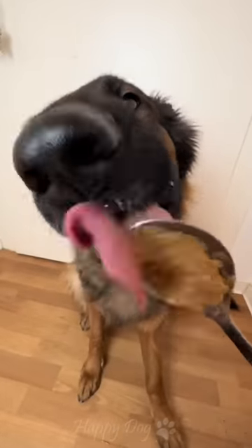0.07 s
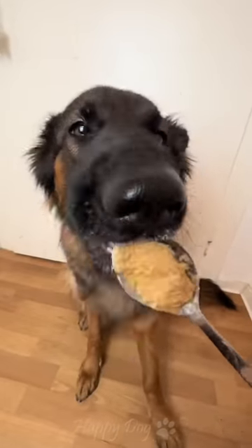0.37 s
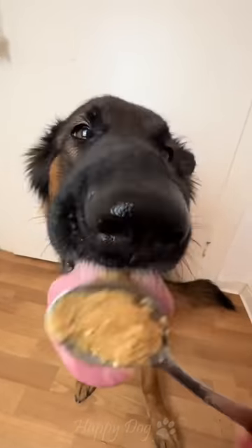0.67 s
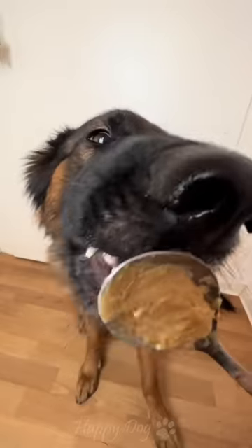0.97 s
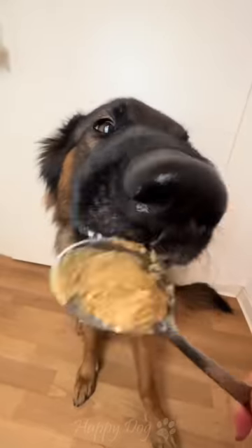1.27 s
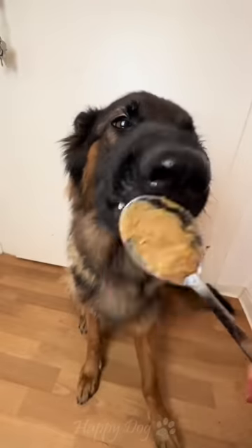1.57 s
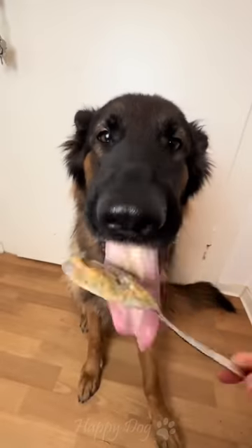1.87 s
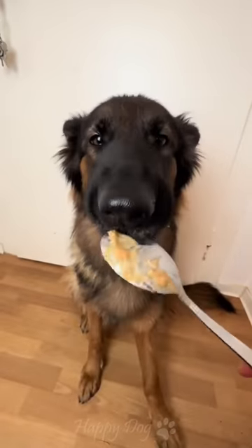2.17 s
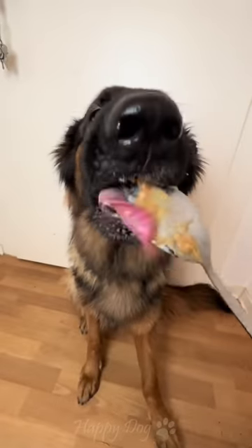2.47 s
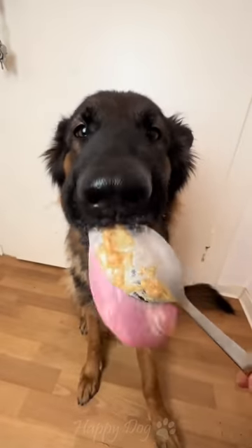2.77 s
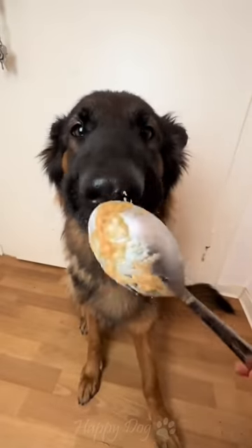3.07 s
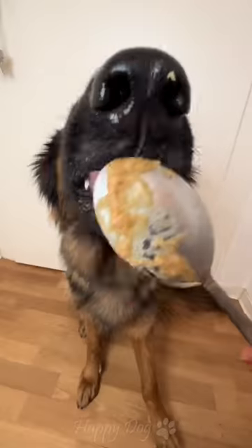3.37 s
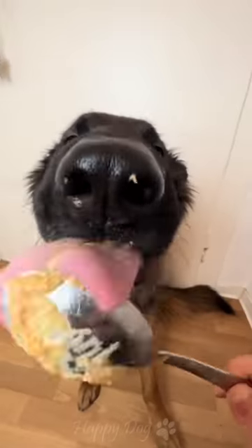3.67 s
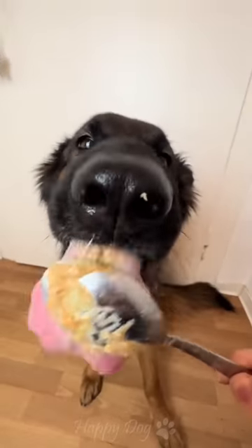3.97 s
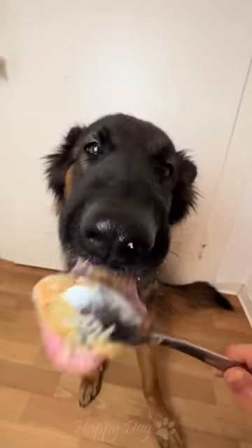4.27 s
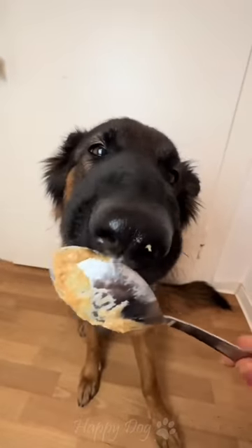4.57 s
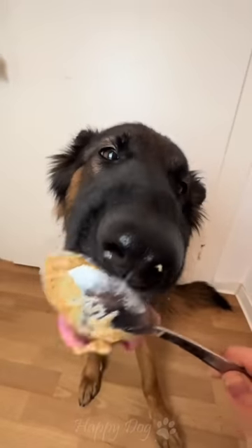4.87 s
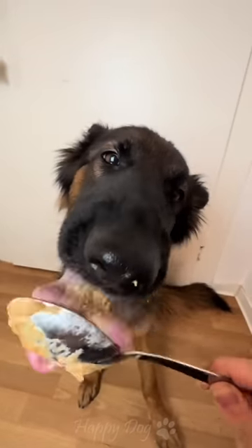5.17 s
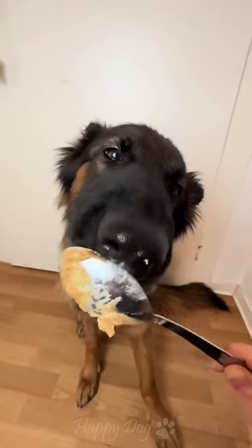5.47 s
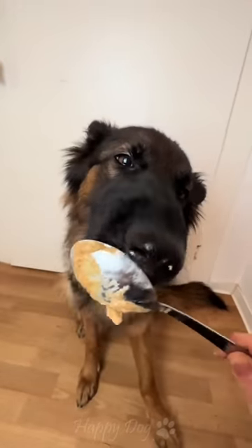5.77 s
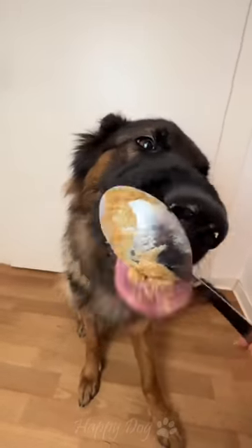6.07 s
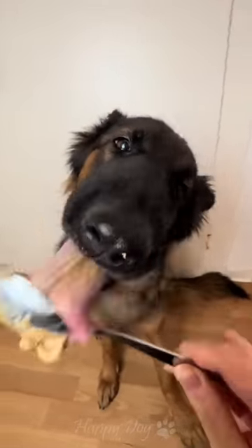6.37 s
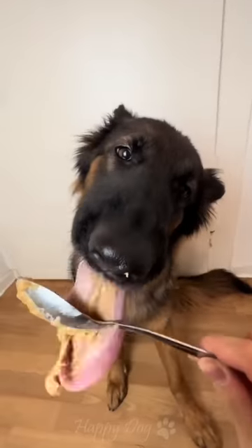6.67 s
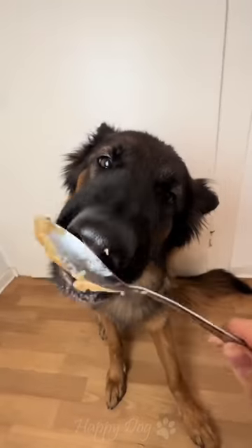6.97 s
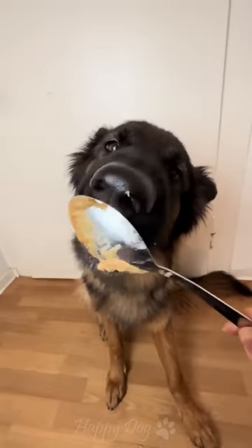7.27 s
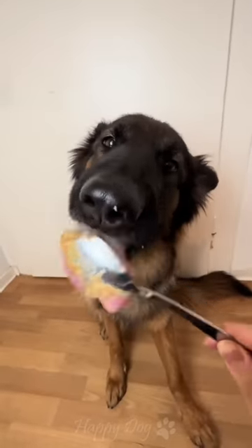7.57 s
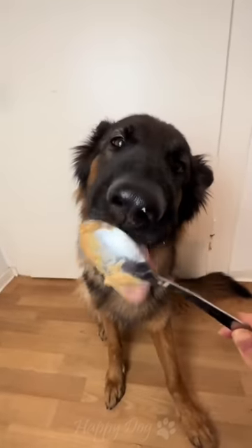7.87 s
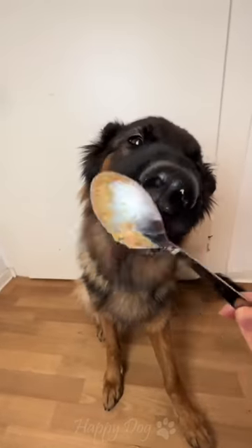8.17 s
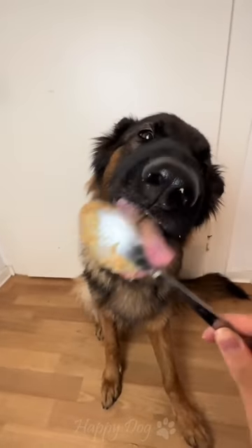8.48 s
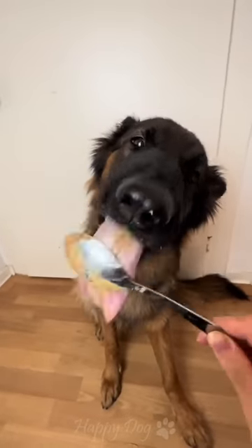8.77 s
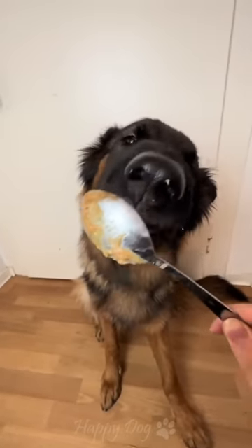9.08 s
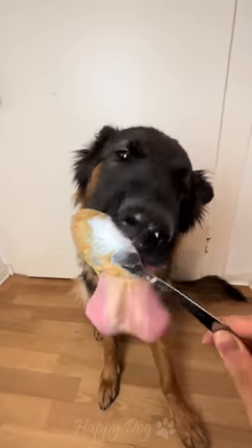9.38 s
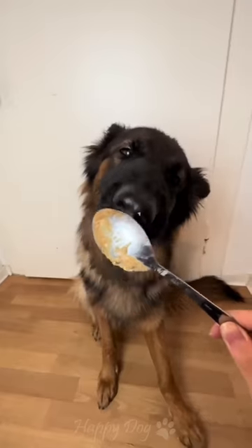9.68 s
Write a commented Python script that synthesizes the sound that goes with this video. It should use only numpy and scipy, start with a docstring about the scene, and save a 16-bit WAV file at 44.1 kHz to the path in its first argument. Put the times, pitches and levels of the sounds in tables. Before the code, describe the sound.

In a small room with a faint rumble and an appliance whirring, a dog laps at a spoonful of paste very close to the microphone. Its tongue squelches, its lips smack and its jowls flap softly. One loud chomp comes a little before the middle. Later a dollop lands on the floor with a soft thud, and the wet smacking goes on, somewhat stronger, to the end.

```python
"""A dog licks soft paste off a spoon, right in front of a phone's microphones in a small hard-floored room.
Tongue and lips part with sharp wet smacks and longer squelches that ring the mouth; once the jaws
chomp loudly. Up close, the tongue rubs, saliva crackles faintly, the muzzle bumps and the jowls flap.
A dollop of paste lands on the floor. Behind it all lie a low room rumble and an appliance's thin whirr."""
import sys
import numpy as np
from scipy import signal
from scipy.fft import rfft, irfft, next_fast_len
from scipy.io import wavfile
from scipy.ndimage import uniform_filter1d, map_coordinates

SR = 44100
rng = np.random.default_rng(int(sys.argv[2]) if len(sys.argv) > 2 else 0)


def to_wav(sig):
    """Store sig (one row per channel, or 1-D mono) as 16-bit WAV at the path in sys.argv[1].

    Samples outside -1..1 are clipped; the rate is SR.
    """
    pcm = np.clip(np.atleast_2d(sig), -1, 1) * 32767
    pcm = np.round(pcm).astype(np.int16)
    wavfile.write(sys.argv[1], SR, pcm.T)  # frames by channels


N = 433944
SIZE = 8192  # samples in the buffer of one short sound
T = np.arange(SIZE) / SR
HZ = np.fft.rfftfreq(SIZE, 1 / SR)
PEAK_S = T[SIZE // 4]  # where a smack or swell peaks in its buffer


def amp(db):
    return 10 ** (np.asarray(db) / 20)


def unit(x):
    return x / np.sqrt(np.mean(x ** 2) + 1e-20)


def burst(x):
    """Scale a short stereo sound to the energy of 10 ms at rms 1."""
    return unit(x) * np.sqrt(SR / 100 / SIZE)


def along(points, hz):
    """Interpolate (Hz, value) points on a log axis."""
    freqs, values = np.transpose(points)
    return np.interp(np.log(hz + 1), np.log(freqs), values)


def curves(rows):
    """One value per sample for each column after the time."""
    times, *columns = np.transpose(rows)
    return [np.interp(np.arange(N) / SR, times, column) for column in columns]


def filtered(x, response):
    """Filter x by a response given as a function of frequency."""
    size = next_fast_len(N + SR // 2)
    return irfft(rfft(x, size) * response(np.fft.rfftfreq(size, 1 / SR)), size)[..., :N]


def resonance(f, centre, width):
    """Causal response of one damped mode."""
    return 1j * f * width / (centre ** 2 - f ** 2 + 1j * f * width)


def ring(source, hz, width, skirt):
    """A drive spectrum rings one mode, which falls off faster beyond the skirt width."""
    return burst(irfft(source * resonance(HZ, hz, width) * resonance(HZ, hz, skirt)))


def add(track, s, sound):
    """Mix a sound in at s seconds."""
    start = round(s * SR)
    part = sound[:, max(-start, 0):max(N - start, 0)]
    track[:, max(start, 0):max(start, 0) + part.shape[1]] += part


def swell(length):
    """A rise and fall about length seconds long, centred on PEAK_S."""
    return np.exp(-np.abs((T - PEAK_S) / (0.28 * length)) ** 2.4)


def wobble(rate):
    """A smooth random curve, rate knots a second."""
    return map_coordinates(rng.standard_normal(int(N * rate / SR) + 4), [np.arange(N) * rate / SR])


# How alike the two microphones hear. Each row: frequency in Hz, left-right correlation.
MIC_LIKENESS = [(60, 0.98), (200, 0.98), (600, 0.54), (2000, 0.76), (5000, 0.45), (12000, 0.64)]
def mic_pair(spectra, f):
    """Turn two unrelated spectra into a partly alike left and right."""
    turn = np.arccos(np.clip(along(MIC_LIKENESS, f), 0, 1)) / 2
    mid, side = spectra[0] * np.cos(turn), spectra[1] * np.sin(turn)
    return np.array([mid + side, mid - side])


def coloured(x, response):
    """Filter two unrelated signals into a long stereo sound of rms 1."""
    size = next_fast_len(N + SIZE)
    f = np.fft.rfftfreq(size, 1 / SR)
    return unit(irfft(mic_pair(rfft(x, size), f) * response(f), size)[:, :N])


# The room's rumble. Each row: frequency in Hz, relative level in dB.
RUMBLE_SPECTRUM = [(15, -8), (30, -1), (65, 5), (120, 1), (170, -22.5), (300, -9.5), (520, -49),
                   (1200, -11), (3000, -55.5), (15000, -78)]
# An appliance in the background. Each row: centre in Hz, width in Hz, relative level in dB.
WHIRR_BANDS = [(825, 58, -12.5), (1700, 370, -4.5)]
def room_tone(rumble_db=-59, whirr_db=-58):
    """Behind the dog: steady room rumble and the airy whirr of an appliance."""
    rumble = coloured(rng.standard_normal((2, N)), lambda f: amp(along(RUMBLE_SPECTRUM, f)))
    bands = lambda f: sum(amp(db) * abs(resonance(f, hz, width)) ** 2 for hz, width, db in WHIRR_BANDS)
    whirr = coloured(rng.standard_normal((2, N)), bands)
    return amp(rumble_db) * rumble + amp(whirr_db) * whirr


# Jowls and body moving near the phone. Each row: time in seconds, level in dB before gain_db.
JOWL_LEVELS = [(0, -64), (.25, -47.5), (.38, -67.5), (1.06, -50), (1.34, -60.5), (1.7, -54), (2.05, -48.5),
               (2.43, -71), (2.62, -53), (2.95, -58), (3.45, -51), (4.25, -54), (5.1, -53), (5.37, -61),
               (5.8, -54), (6.9, -57), (8.5, -64), (9.84, -57.5)]
def jowls(hz=85, width_hz=90, gain_db=-2, edge_hz=300):
    """Loose lips and fur flap with a dull murmur."""
    def dull(f):
        return resonance(f, hz, width_hz) * resonance(f, hz, 3 * width_hz) / np.hypot(1, (f / edge_hz) ** 2)
    level, = curves(JOWL_LEVELS)
    return amp(level + gain_db) * coloured(rng.standard_normal((2, N)), dull)


def crackle(size, rate, spread_db, hiss):
    """Two streams of tiny saliva films bursting, rate a second, of uneven sizes, over a smooth hiss."""
    pops = (rng.random((2, size)) < rate / SR) * rng.choice([-1, 1], (2, size))
    sizes = amp(spread_db * np.minimum(rng.standard_normal((2, size)), 2))
    return unit(pops * sizes) + hiss * rng.standard_normal((2, size))


def wet_patches(x, patchy_db):
    """Wet spots come and go: short patches of gain, each in its own band."""
    spectra = signal.stft(x, nperseg=256)[2]
    patches = rng.standard_normal(spectra.shape[1:])
    patches = uniform_filter1d(uniform_filter1d(patches, size=9, axis=0), size=6, axis=1)
    return signal.istft(spectra * amp(patchy_db * unit(patches)), nperseg=256)[1][:, :N]


# The wet mouth between strokes. Each row: time in seconds, tongue rub and saliva fizz in relative dB.
RESTING_WETNESS = [(0.0, -49.5, -55), (0.46, -56.5, -58), (1.18, -53, -54), (1.64, -55, -61),
                   (2.77, -51.5, -55.5), (2.99, -52, -59), (3.75, -53.5, -53.5), (4.33, -50, -55.5),
                   (6.47, -48, -55), (7.01, -51.5, -57), (7.34, -48, -52.5), (8.74, -51, -56),
                   (9.15, -48, -50.5), (9.84, -49, -60.5)]
# Soft strokes over the spoon. Each row: middle in seconds, length in seconds, level in dB.
TONGUE_STROKES = [(.64, 0.02, -45.5), (1.1, 0.045, -50), (1.19, 0.053, -51.5), (1.33, 0.054, -47),
                  (1.47, .04, -51), (1.62, 0.043, -56), (1.89, 0.054, -50), (2.06, 0.025, -51),
                  (2.255, 0.019, -46.5), (2.43, 0.015, -53), (2.69, 0.045, -48), (3.05, 0.01, -49),
                  (3.27, .07, -52), (3.44, 0.063, -50), (3.58, 0.043, -53), (3.65, 0.048, -50),
                  (3.86, 0.24, -52), (3.97, 0.051, -56), (4.04, 0.028, -58), (4.19, 0.12, -61),
                  (4.66, 0.02, -49), (4.75, 0.037, -48), (5.12, 0.03, -62), (5.66, 0.15, -56),
                  (5.768, 0.028, -44.5), (6.11, 0.033, -54), (6.58, 0.072, -53), (6.91, 0.026, -55),
                  (7.33, 0.2, -56), (7.45, 0.03, -43.5), (7.81, 0.035, -56), (7.995, 0.025, -50),
                  (8.27, 0.032, -63), (8.36, 0.03, -47.5), (8.54, 0.036, -51), (8.69, 0.031, -53.5),
                  (8.885, 0.039, -51), (9.095, 0.057, -54), (9.41, 0.012, -52), (9.47, 0.01, -57)]
def tongue_levels(rest_rub_db=-4, rest_fizz_db=-1, stroke_rub_db=-1, slide_s=0.022, slide_db=-16):
    """Rub and fizz in dB: both swell on each stroke; the rub slides on after each smack and squelch."""
    def power(rows):
        t = np.linspace(0, N / SR, N // 64)
        swells = sum(amp(db) ** 2 * np.exp(-(2 * (t - s) / length) ** 2) for s, length, db in rows)
        return np.interp(np.arange(N) / SR, t, swells)
    strokes = power(TONGUE_STROKES)
    slides = power([(s + slide_s / 2, slide_s, cavity_db + slide_db)
                    for s, _, cavity_db, *_ in LIP_SMACKS + TONGUE_SQUELCHES])
    rub_db, fizz_db = curves(RESTING_WETNESS)
    rub = amp(rub_db + rest_rub_db) ** 2 + amp(stroke_rub_db) ** 2 * strokes + slides
    fizz = amp(fizz_db + rest_fizz_db) ** 2 + strokes
    return 10 * np.log10(rub), 10 * np.log10(fizz)


# Tongue rub and saliva fizz at close range. Each row: frequency in Hz, relative level in dB.
RUB_SPECTRUM = [(300, 5), (550, 5.5), (820, 11), (1150, 8), (1700, 10.5), (2700, 10.5), (4200, 6.5),
                (6000, -65)]
FIZZ_SPECTRUM = [(2500, -87), (4500, 10.5), (6000, 8.5), (8000, 6), (11000, 6.5), (13500, -1.5),
                 (16000, -6.5)]
def licking(clump_db=3.0):
    """The tongue sticks and slips on the spoon, so its rub and the fizz of saliva come in clumps."""
    rub_db, fizz_db = tongue_levels()
    clumps = clump_db * wobble(rate=110)
    slips = wet_patches(crackle(N, rate=1500, spread_db=3, hiss=1.4), patchy_db=2)
    films = wet_patches(crackle(N, rate=2000, spread_db=3, hiss=1.3), patchy_db=2.1)
    rub = coloured(slips, lambda f: amp(along(RUB_SPECTRUM, f)))
    fizz = coloured(films, lambda f: amp(along(FIZZ_SPECTRUM, f)))
    return amp(rub_db + clumps) * rub + amp(fizz_db + clumps) * fizz


# The mouth changes shape as the dog works, and slacker cheeks thud more.
# Each row: time in seconds, cavity note in Hz, added cheek thud in dB.
MOUTH_SHAPES = [(0, 800, -3), (1.2, 880, -3.5), (1.96, 780, 1), (2.75, 753, -1), (3.77, 780, -3.5),
                (4.6, 860, -1), (5.1, 810, -5), (5.72, 764, 0.5), (6.4, 834, -6.5), (6.6, 896, -12),
                (6.75, 765, -0.5), (7.1, 770, 5), (7.4, 830, -2), (7.74, 640, 6.5), (7.94, 850, -0.5),
                (8.12, 783, 4), (8.8, 815, -6.5), (9.3, 794, -3), (9.6, 854, -3)]
# A harder smack shakes the cheeks more. Each row: cavity level in dB, cheek thud in dB.
CHEEK_THUD = [(-58, -78), (-50.5, -58), (-44, -47), (-36, -39.5), (-27, -33.5)]
# Spray is low behind closed lips, high on the bare tongue. Each row: dB over the lip gap, pitch in Hz.
SPRAY_PITCH = [(-20, 5500), (-3, 6650), (-3.5, 7060), (35, 11700), (21.5, 12000)]
# Modes of the soft muzzle and the wet lips. Each row: centre in Hz, width in Hz, relative level in dB.
CHEEK_MODES = [(226, 88, 7), (437, 98, 6)]
SPLASH_MODES = [(2430, 720, -7), (5150, 620, -15)]
def mouth(drive, s, voicing, spray_q, spray_skirt, cavity_q=6.5, lip_q=6, note_scatter=0.015):
    """The drive rings the soft cheeks, the mouth cavity, the lip gap and the thin spray of saliva."""
    cavity_db, lip_hz, lip_db, spray_db = voicing
    times, notes, slack_db = np.transpose(MOUTH_SHAPES)
    cavity_hz = np.interp(s, times, notes) * np.exp(note_scatter * rng.standard_normal())
    thud_db = np.interp(cavity_db, *np.transpose(CHEEK_THUD)) + np.interp(s, times, slack_db)
    spray_hz = np.interp(spray_db - lip_db, *np.transpose(SPRAY_PITCH))
    source = mic_pair(rfft(drive), HZ)
    # neighbouring modes swing in opposite senses, which fills the valley between them
    cheeks = burst(sum((-1) ** k * amp(db) * ring(source, hz, width, hz)
                       for k, (hz, width, db) in enumerate(CHEEK_MODES)))
    cavity = ring(source, cavity_hz, cavity_hz / cavity_q, cavity_hz)
    # the narrow note of the lip gap stands on a broader splash
    splash = sum(amp(db) * ring(source, hz, width, width) for hz, width, db in SPLASH_MODES)
    lips = burst(ring(source, lip_hz, lip_hz / lip_q, lip_hz / 2) + splash)
    spray = ring(source, spray_hz, spray_hz / spray_q, spray_skirt * spray_hz)
    return amp(thud_db) * cheeks + amp(cavity_db) * cavity + amp(lip_db) * lips + amp(spray_db) * spray


# The sliding tongue, right at the microphones. Each row: middle in seconds, length in seconds,
# mouth cavity in dB, lip gap pitch in Hz, lip gap in dB, spray in dB.
TONGUE_SQUELCHES = [(.01, 0.023, -42.5, 5840, -36.5, -40), (0.19, 0.14, -42, 2610, -43.5, -43.5),
                    (.43, 0.023, -50, 1460, -44, -44), (0.438, 0.075, -49.5, 2750, -40, -42),
                    (.658, 0.02, -43, 2360, -49, -37), (0.679, 0.048, -57, 2920, -48, -43),
                    (0.738, .022, -60, 7250, -36, -34), (0.862, 0.062, -42, 2750, -44.5, -49.5),
                    (1.004, 0.046, -42, 1660, -63, -51), (1.111, .019, -47, 2270, -50, -45),
                    (1.235, 0.068, -39.5, 1800, -66, -39), (1.246, .012, -51, 2060, -43, -59),
                    (1.494, 0.045, -44, 2930, -48, -59), (1.648, 0.037, -47, 1130, -35.5, -63),
                    (1.716, 0.078, -49, 1720, -49, -55), (1.882, 0.12, -49.5, 1700, -66, -45),
                    (2.028, .053, -47, 1910, -45.5, -32), (2.332, .06, -67, 1800, -72, -48),
                    (2.77, 0.024, -39.5, 1280, -36, -37), (2.872, 0.044, -48, 2380, -43.5, -46.5),
                    (3.109, 0.053, -45, 1740, -55, -58), (3.47, 0.1, -43.5, 1650, -46, -49),
                    (3.568, 0.038, -58, 2600, -59, -37), (3.766, 0.051, -37.5, 1660, -35.5, -37),
                    (3.83, .041, -44, 2350, -48, -46), (3.985, .009, -47.5, 1990, -62, -66),
                    (4.756, 0.0087, -57, 3100, -45, -39), (4.992, 0.063, -43.5, 2880, -41.5, -56),
                    (5.098, 0.059, -54, 3200, -45, -36.5), (5.186, 0.063, -39.5, 3080, -37, -48),
                    (5.454, 0.079, -66, 1910, -49, -38), (5.697, 0.012, -38.5, 2810, -35, -60),
                    (5.736, .021, -36.5, 2620, -34.5, -55), (5.864, 0.052, -38.5, 2620, -36, -44),
                    (5.909, 0.035, -55, 2210, -39, -60), (5.994, 0.032, -42, 2760, -46, -50),
                    (6.192, 0.063, -48, 2160, -42.5, -46.5), (6.336, 0.021, -53, 1350, -42, -54),
                    (6.363, 0.046, -40, 2870, -36.5, -37.5), (6.444, 0.061, -35.5, 2100, -38, -34.5),
                    (6.509, 0.021, -34.5, 1840, -40.5, -65), (6.614, .014, -31, 2250, -44, -35.5),
                    (6.714, 0.047, -29, 2700, -25.5, -40), (6.737, 0.075, -49, 2820, -36, -45),
                    (6.869, 0.021, -46, 2170, -51, -68), (6.908, 0.044, -59, 2000, -62.5, -38),
                    (7.039, 0.0095, -51, 1430, -42.5, -59), (7.078, .065, -45, 2740, -45, -47),
                    (7.237, 0.054, -35, 2550, -34, -41.5), (7.404, 0.037, -34, 2870, -37.5, -42),
                    (7.554, 0.047, -45.5, 1960, -46, -43.5), (7.64, 0.055, -59, 2950, -42, -34.5),
                    (7.74, 0.018, -42.5, 2850, -30.5, -39), (7.819, .07, -65, 1800, -70, -43),
                    (7.995, 0.064, -56, 2400, -58, -39), (8.115, 0.052, -38.5, 2300, -29.5, -38.5),
                    (8.346, 0.041, -58, 2060, -45, -43), (8.433, .031, -49.5, 1470, -44, -49),
                    (8.611, 0.075, -43.5, 1390, -43, -51), (8.802, 0.036, -34, 1610, -37.5, -41),
                    (8.983, .051, -32, 1700, -33, -43), (9.059, .038, -62, 2880, -42.5, -46),
                    (9.152, 0.034, -33, 2970, -37, -41), (9.228, 0.028, -60, 2900, -35, -52),
                    (9.252, .019, -53, 3200, -36, -60), (9.336, 0.029, -41.5, 2420, -45.5, -46.5),
                    (9.371, 0.058, -34.5, 2410, -27.5, -41.5), (9.519, 0.053, -42.5, 2920, -44, -47),
                    (9.578, 0.036, -43.5, 2510, -42, -50), (9.76, 0.052, -35.5, 2260, -28.5, -40.5)]
def squelches():
    """The tongue peels off the paste: a swelling crowd of tiny bursts."""
    out = np.zeros((2, N))
    for s, length, *voicing in TONGUE_SQUELCHES:
        films = crackle(SIZE, rate=3000, spread_db=3, hiss=0.5) * swell(length)
        add(out, s - PEAK_S, mouth(films, s, voicing, spray_q=1.4, spray_skirt=0.9))
    return out


def saliva_ticks(decay_s=0.00025, count=130, base_db=-6, spread_db=8, low_hz=4500, pitch_ratio=3.1):
    """Single threads of saliva snap at random, louder where the fizz is strong."""
    out = np.zeros((2, N))
    _, fizz_db = tongue_levels()
    for when, pitch, size in rng.random((count, 3)):
        snap = rng.standard_normal((2, SIZE)) * np.exp(-T / decay_s)
        hz = low_hz * pitch_ratio ** pitch
        db = fizz_db[int(when * N)] + base_db + spread_db * size ** 2
        add(out, when * N / SR, amp(db) * ring(mic_pair(rfft(snap), HZ), hz, hz, 2 * hz))
    return out


# Dull thumps from the muzzle and jaw close by, and at 6.88 s a dollop of paste landing on the floor.
# Each row: middle in seconds, length in seconds, pitch in Hz, level in dB.
SOFT_THUMPS = [(0.209, 0.045, 80, -45), (0.652, 0.012, 101, -50), (1.645, 0.014, 200, -39.5),
               (4.433, .029, 220, -45.5), (4.907, 0.011, 85, -40.5), (5.191, 0.1, 101, -40),
               (5.996, 0.0042, 194, -42), (6.165, 0.035, 260, -44), (6.882, 0.087, 98, -35),
               (6.88, 0.054, 263, -38), (7.04, 0.012, 300, -41.5), (7.737, 0.037, 424, -32),
               (9.18, 0.011, 450, -30.5), (9.604, 0.012, 457, -45), (9.762, 0.03, 458, -34.5)]
def soft_thumps():
    """A soft impact gives a low push that hardly rings."""
    out = np.zeros((2, N))
    for s, length, hz, db in SOFT_THUMPS:
        push = rng.standard_normal((2, SIZE)) * swell(length)
        add(out, s - PEAK_S, amp(db) * ring(mic_pair(rfft(push), HZ), hz, hz, hz))
    return out


# Sharp smacks, right at the microphones. Each row: snap time in seconds, about a third of the spatter's
# decay time in seconds, mouth cavity in dB, lip gap pitch in Hz, lip gap in dB, spray in dB.
LIP_SMACKS = [(0.421, 0.0018, -54, 1500, -42.5, -46), (0.5895, 0.0014, -49.5, 1610, -53, -64),
              (0.746, .0009, -49.5, 7040, -29.5, -26), (.7875, 0.00084, -66, 2200, -47, -67),
              (.9418, 0.0021, -55, 1760, -49, -42.5), (1.01, 0.0022, -33, 2070, -41.5, -39.5),
              (1.2345, 0.0012, -30, 2120, -59, -34.5), (1.2925, .003, -48.5, 3170, -46, -46),
              (1.32, 0.0016, -65, 3280, -46, -41), (1.519, 0.0026, -54.5, 2900, -41, -43),
              (1.8253, 0.00046, -58, 2620, -43.5, -48), (1.9588, 0.0012, -36, 1820, -62, -72),
              (2.08, 0.0022, -50, 2950, -46, -51), (2.268, 0.0017, -55, 2100, -44, -46),
              (2.376, 0.0023, -42, 1820, -49, -41), (2.5726, 0.0011, -45, 1950, -52, -37.5),
              (2.755, .0012, -39, 1630, -37, -29.5), (3.314, 0.0031, -51, 3080, -46.5, -40.5),
              (3.421, 0.0017, -67, 2230, -47.5, -45), (3.498, .0013, -54, 1970, -50, -40.5),
              (3.9, 0.0023, -54, 2720, -43.5, -44.5), (4.054, 0.0048, -72, 2940, -30.5, -33),
              (4.3983, .0014, -74, 2000, -55, -38.5), (4.618, .0046, -40, 1610, -64, -66),
              (4.8627, 0.0027, -50, 2300, -41, -54), (4.923, 0.0043, -71, 2700, -45.5, -39),
              (5.03, 0.0024, -45, 1670, -48, -64), (5.281, 0.0041, -58, 2870, -43.5, -38),
              (5.38, .003, -51, 2930, -40, -47.5), (5.502, 0.0012, -43.5, 1140, -38.5, -65),
              (5.5404, 0.0017, -34.5, 2720, -37, -48), (5.618, .002, -62, 1750, -56, -40),
              (5.702, 0.0015, -39, 2400, -37.5, -46.5), (5.927, 0.0039, -55, 2880, -40.5, -47),
              (6.0274, 0.0033, -42, 2500, -37.5, -49), (6.276, 0.0045, -55, 2020, -48, -41.5),
              (6.305, 0.00074, -62, 2900, -40.5, -53), (6.797, .001, -64, 3120, -43, -57),
              (6.8265, 0.00089, -41, 1190, -32, -63), (6.8944, 0.0011, -37.5, 1850, -42, -59),
              (7.048, 0.0024, -45, 3120, -43, -66), (7.064, 0.0022, -50, 2900, -61, -44.5),
              (7.1213, 0.00093, -51.5, 2400, -31.5, -51), (7.295, 0.0023, -59, 2850, -47, -38),
              (7.329, 0.0029, -74, 3060, -50, -42), (7.4663, 0.0016, -46, 2940, -40.5, -27.5),
              (7.94, 0.0016, -29, 2380, -28.5, -46), (8.1805, 0.0015, -68, 2270, -39.5, -50),
              (8.283, .0008, -50, 1390, -44, -39), (8.316, 0.001, -39.5, 2400, -35.5, -44),
              (8.35, .002, -64, 2050, -37, -37), (8.4467, .005, -46, 2820, -41.5, -45),
              (9.1818, 0.0015, -35.5, 2250, -25, -38.5), (9.2354, 0.0013, -51, 3040, -33.5, -40.5),
              (9.286, .002, -66, 2800, -57, -45), (9.5745, .002, -47, 2300, -36, -52),
              (9.601, 0.0016, -28, 2690, -19.5, -47), (9.645, 0.002, -65, 3320, -37, -61)]
def smacks(snap_gain=0.6, snap_s=0.00011, suction_s=0.012, suction_db=-19):
    """A wet seal stretches with a rising crackle, then breaks: one snap and a spatter of smaller ones."""
    out = np.zeros((2, N))
    since = T - PEAK_S
    suction = amp(suction_db) * np.exp(-abs(since) / suction_s)
    for s, length, *voicing in LIP_SMACKS:
        release = np.exp(-abs(since) / (2.96 * length))
        envelope = np.where(since < 0, suction, release)
        spatter = crackle(SIZE, rate=4900, spread_db=-2, hiss=0.43) * envelope
        drive = spatter / np.linalg.norm(spatter[0])
        # the snap is a brief ragged push of air
        snap = (since >= 0) * np.exp(-abs(since) / snap_s) * (0.7 + rng.standard_normal(SIZE))
        drive[0] += snap_gain * snap / np.linalg.norm(snap)
        add(out, s - PEAK_S, mouth(drive, s, voicing, spray_q=1.1, spray_skirt=1.1))
    return out


# One loud chomp in front of the phone. Each row: middle in seconds, length in seconds, level in dB.
CHOMP_BURSTS = [(4.227, 0.039, -21), (4.235, 0.014, -18.5), (4.2378, 0.0046, -21.5), (4.246, 0.005, -33)]
# The closing mouth. Each row: centre in Hz, width in Hz, relative level in dB, left over right in dB.
JAW_MODES = [(513, 380, -4.5, -5), (662, 200, 4, 6), (1760, 390, 5, -4), (2550, 460, 3, 5),
             (8800, 6800, -5, 0)]
def chomp():
    """The jaws close in a quick crescendo through the mouth's resonances, each aimed its own way."""
    out = np.zeros((2, N))
    sides = np.array([[0.5], [-0.5]])
    for s, length, db in CHOMP_BURSTS:
        films = crackle(SIZE, rate=2500, spread_db=3, hiss=0.4) * swell(length)
        source = mic_pair(rfft(films), HZ)
        jaw = sum(amp(mode_db + pan_db * sides) * ring(source, hz, width, width)
                  for hz, width, mode_db, pan_db in JAW_MODES)
        add(out, s - PEAK_S, amp(db) * burst(jaw))
    return out


# The small room around the phone. Each row: frequency in Hz, seconds to die away by 60 dB.
ROOM_DECAY = [(150, 0.19), (700, 0.19), (3000, 0.096), (8000, 0.12), (15000, 0.053)]
def reflections(x, build_s=0.0054, pieces=20):
    """The walls answer with a short, soft tail, duller as it dies; each piece gets a fresh random tail."""
    out, start = np.zeros((2, N)), 0
    for piece in np.array_split(x, pieces, axis=1):
        hz, t, noise = signal.stft(rng.standard_normal((2, SR // 2)), SR, nperseg=256)
        decay = amp(-60 * t / along(ROOM_DECAY, hz)[:, None])
        tail = signal.istft(noise * decay, SR, nperseg=256)[1]
        tail *= 1 - np.exp(-(np.arange(tail.shape[1]) / SR / build_s) ** 2)
        add(out, start / SR, signal.fftconvolve(piece, tail / np.linalg.norm(tail[0]), axes=1))
        start += piece.shape[1]
    return out


# The two microphone ports hear the dog unequally. Each row: frequency in Hz, left over right in dB.
MIC_BALANCE = [(150, -0.5), (300, 2), (520, -1), (850, -5.5), (1300, 0), (2300, 2), (4000, 1.5), (12000, 0)]
def scene(reflections_db=-12):
    """The dog right in front of the phone, with the walls and the room tone behind."""
    dog = smacks() + squelches() + chomp() + soft_thumps() + saliva_ticks() + licking()
    dog = filtered(dog, lambda f: amp(np.outer([1, -1], along(MIC_BALANCE, f)) / 2))
    return dog + amp(reflections_db) * reflections(dog) + jowls() + room_tone()


def record(dry, top_hz=16200):
    """The phone keeps nothing above its band limit."""
    return filtered(dry, lambda f: f < top_hz)


dry = scene()
out = record(dry)
to_wav(out)
```